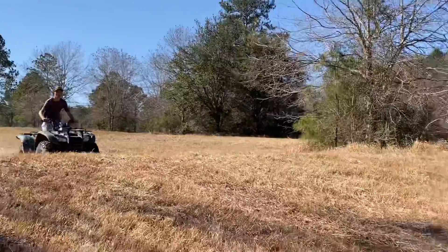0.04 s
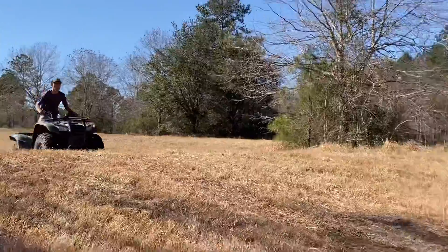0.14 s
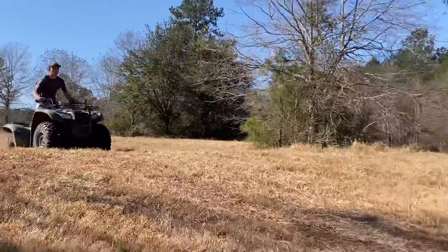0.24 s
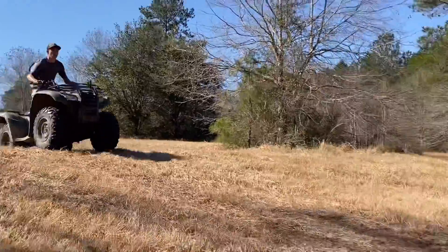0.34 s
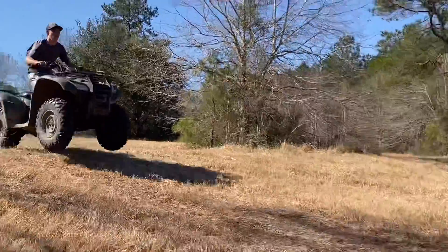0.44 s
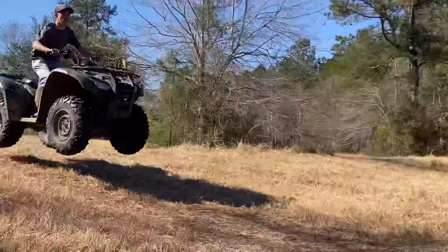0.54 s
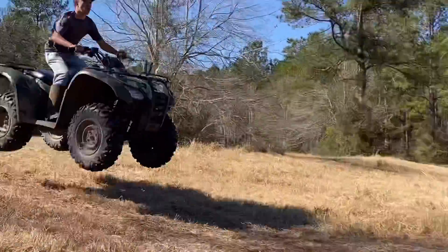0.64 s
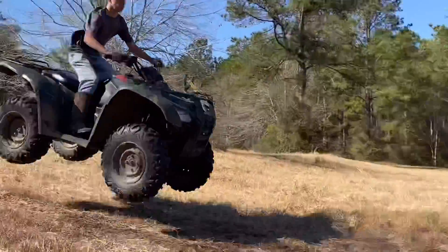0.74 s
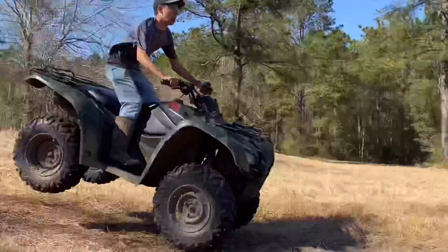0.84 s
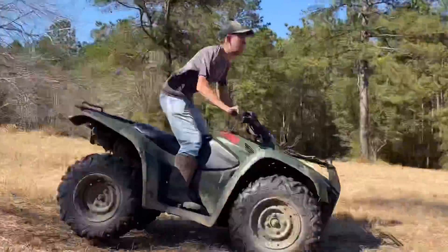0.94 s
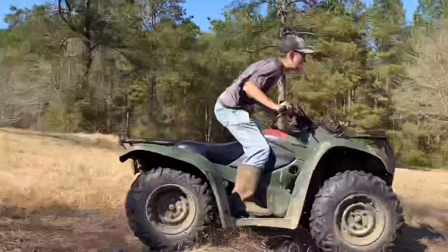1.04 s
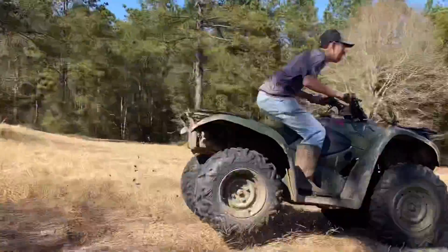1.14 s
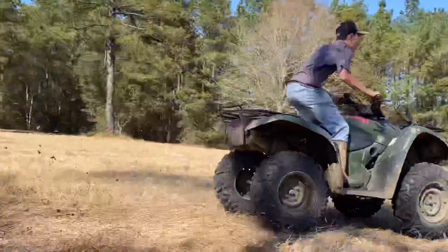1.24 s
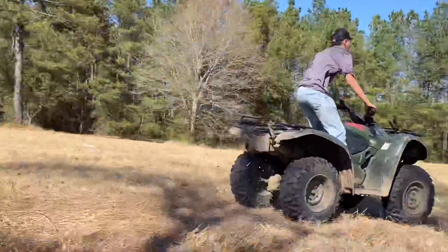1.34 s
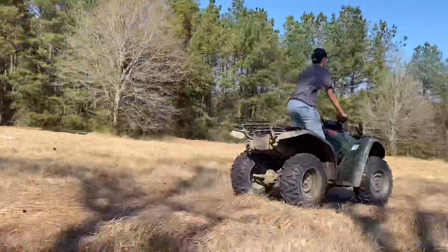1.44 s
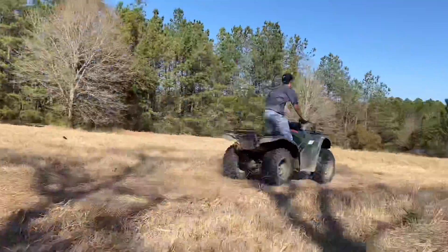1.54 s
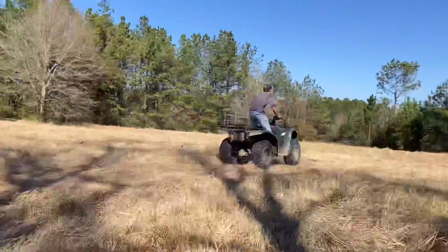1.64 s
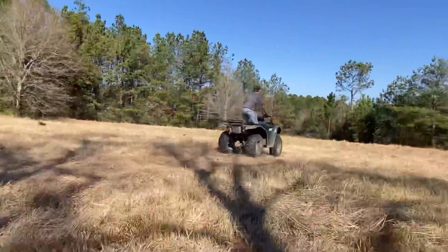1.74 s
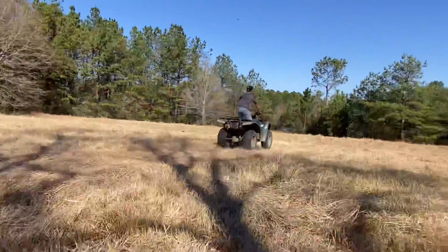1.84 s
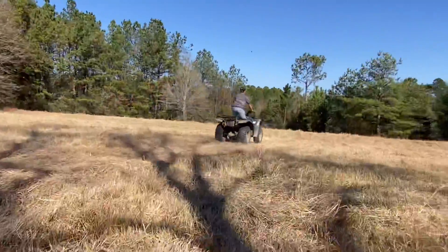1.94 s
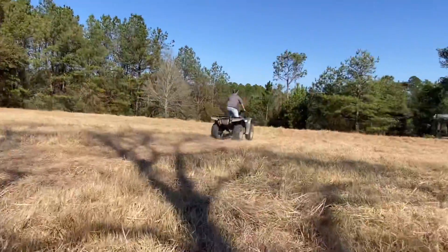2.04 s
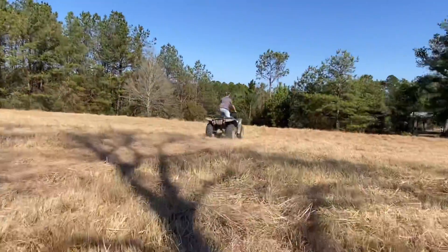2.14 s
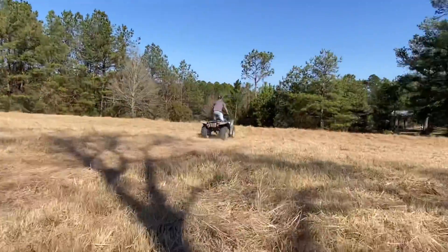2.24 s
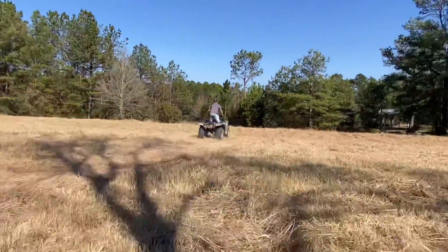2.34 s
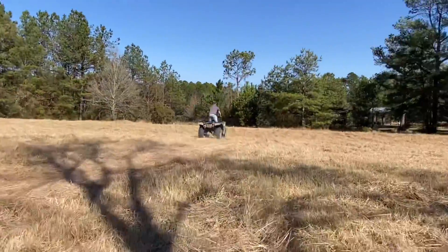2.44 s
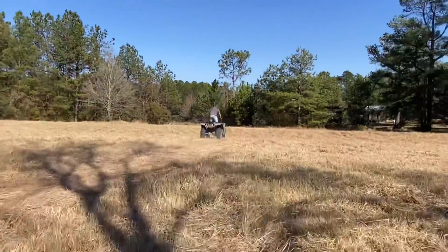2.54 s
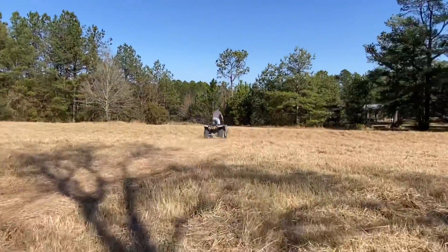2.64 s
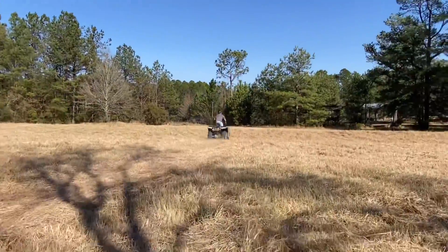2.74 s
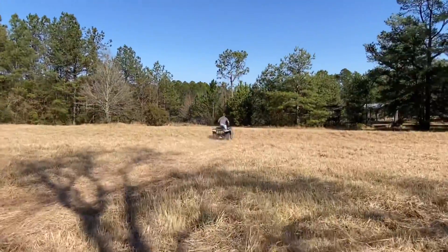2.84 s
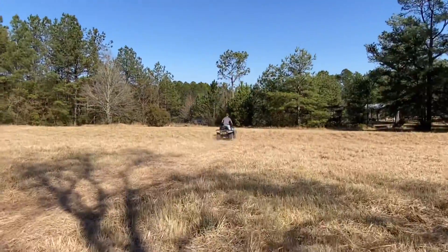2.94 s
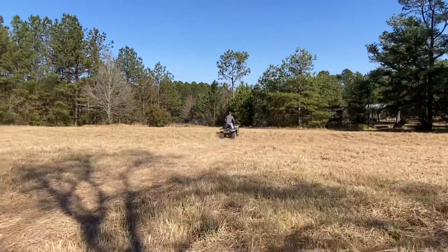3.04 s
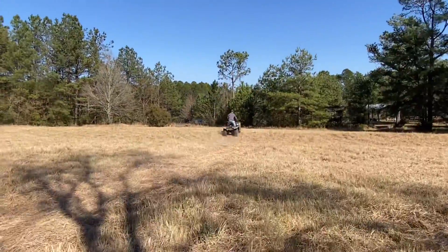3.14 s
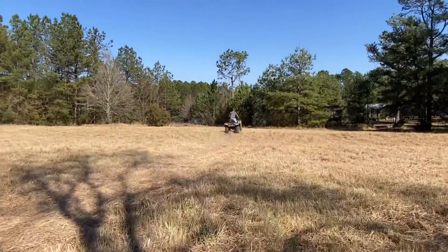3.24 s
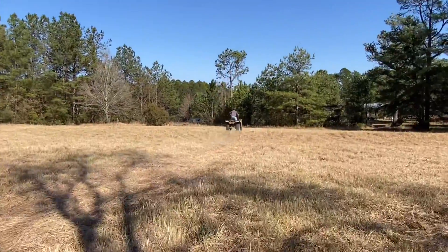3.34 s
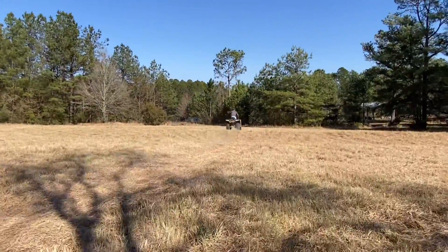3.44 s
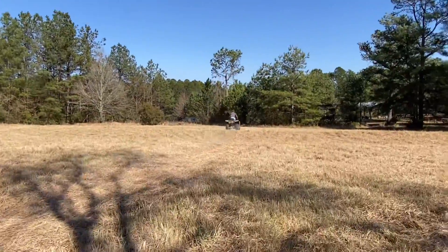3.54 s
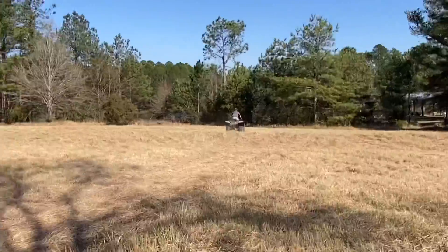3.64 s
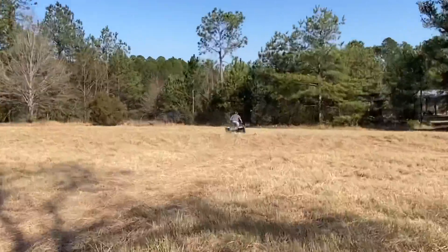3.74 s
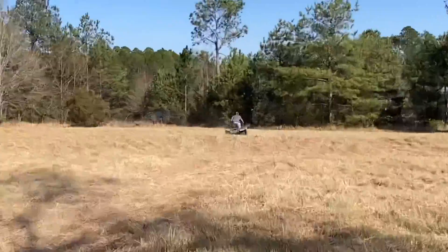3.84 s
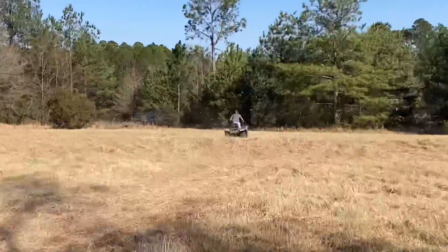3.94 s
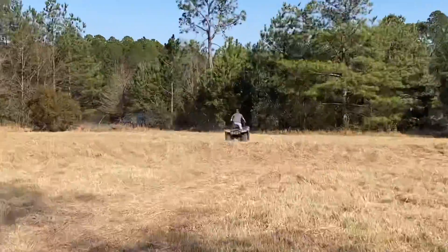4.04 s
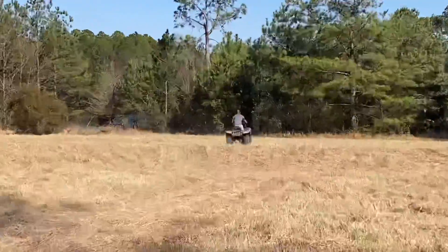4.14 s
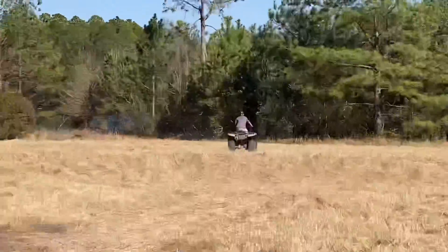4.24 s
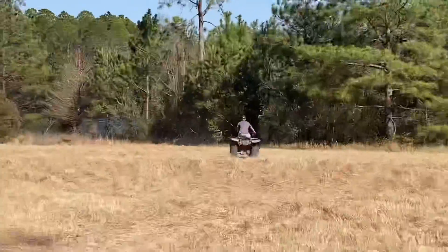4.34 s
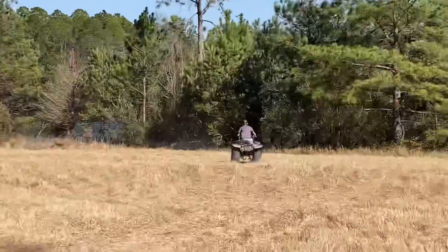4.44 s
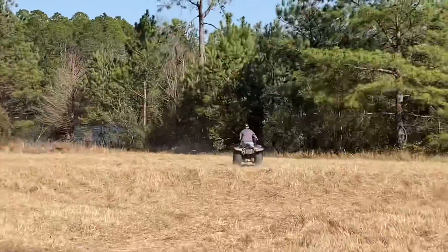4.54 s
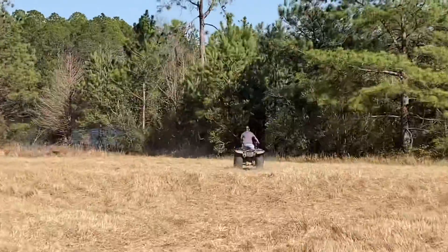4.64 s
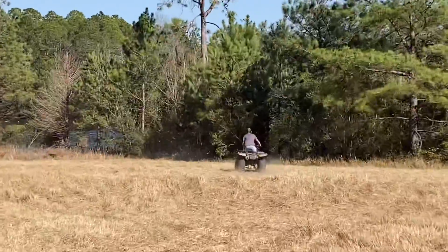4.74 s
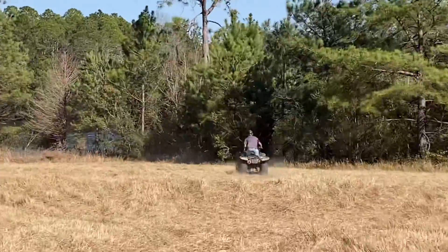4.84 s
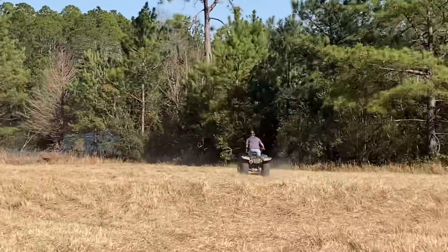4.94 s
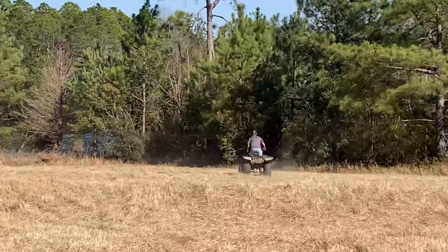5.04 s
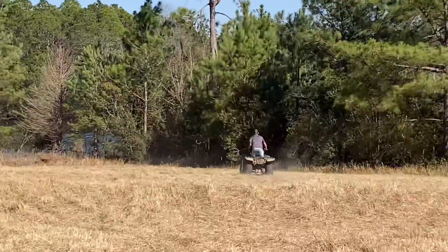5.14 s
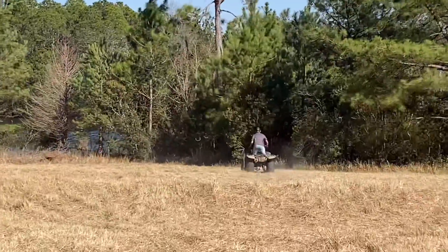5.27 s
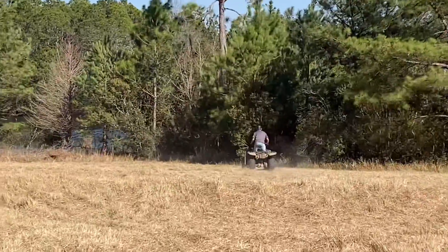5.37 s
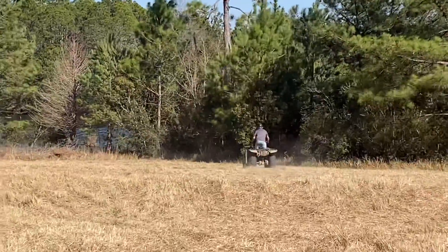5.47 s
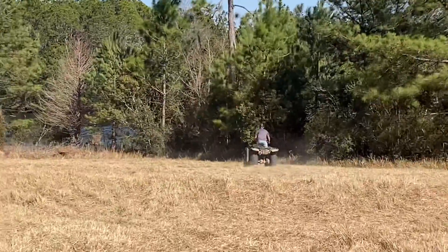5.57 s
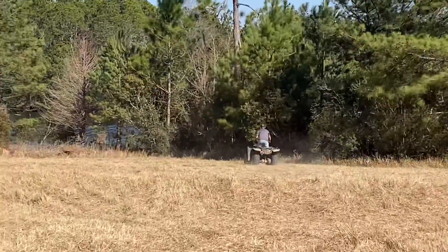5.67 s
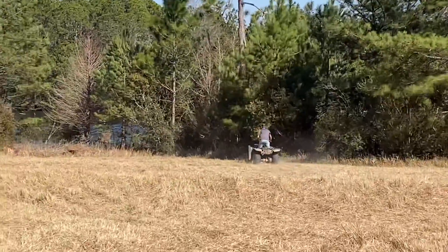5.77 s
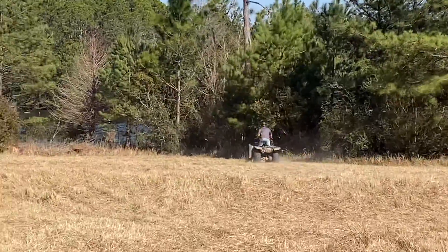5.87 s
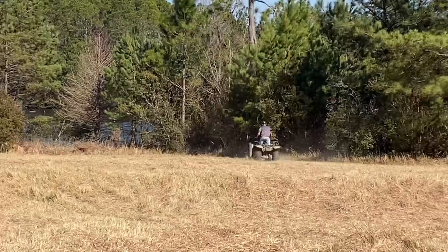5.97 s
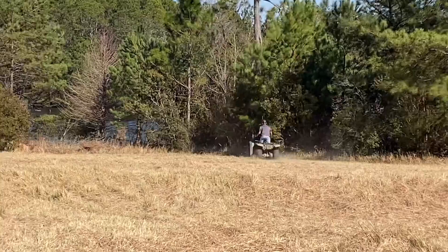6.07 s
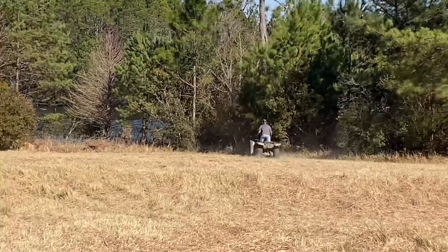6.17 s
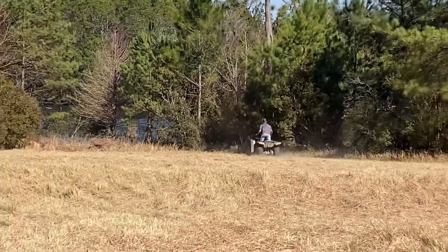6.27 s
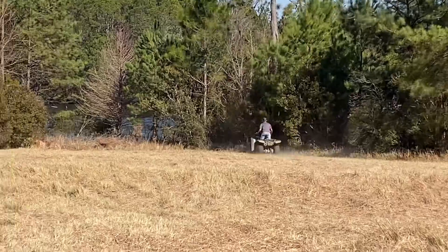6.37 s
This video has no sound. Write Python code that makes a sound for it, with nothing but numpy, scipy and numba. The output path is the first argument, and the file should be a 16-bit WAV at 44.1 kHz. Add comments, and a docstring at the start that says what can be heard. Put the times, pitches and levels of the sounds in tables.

```python
"""A single-cylinder four-stroke quad bike revs past a phone in a dry, windy field. Each firing rings the
muffler and spits a puff of gas, while gears and tyres whir. About a second in, the quad lands from a
jump with a crunch, clanks and squeaks. It rides off, blipping its throttle (short bursts of power).
Around four seconds, gusts slap the microphone and something dry rustles and ticks close by.
Two last, gentler blips follow as the engine fades."""
import sys
import numpy as np
from scipy import signal
from scipy.fft import rfft, irfft, next_fast_len
from scipy.io import wavfile
from scipy.ndimage import uniform_filter1d, map_coordinates
from numba import njit

SR = 44100
rng = np.random.default_rng(int(sys.argv[2]) if len(sys.argv) > 2 else 0)


def store_wav(level_fs):
    """Save 16-bit WAV to argv[1]."""
    pcm = np.round(np.clip(np.atleast_2d(level_fs), -1, 1) * 32767)
    wavfile.write(sys.argv[1], SR, pcm.T.astype(np.int16))


N = 282655
T = np.arange(N) / SR

# tone of the field's quiet hiss: (frequency [Hz], relative level [dB])
FIELD_TONE = [(300, 3.5), (500, -2), (1000, 6.5), (2500, -21), (5000, -58), (8000, -18.5), (16000, -36)]
# wind on the microphone: (time [s], level [dB])
WIND_LEVEL = [(0.0, -22), (0.35, -18.5), (0.55, -29), (1.2, -20.5), (1.5, -33), (2.0, -28), (2.7, -25.5),
              (2.95, -18.5), (3.4, -26.5), (3.9, -17.5), (4.35, -33.5), (5.6, -35.5), (5.95, -31),
              (6.41, -37)]
# sudden slaps of wind: (time [s], peak [dB], pitch [Hz], sharpness [0-1])
WIND_SLAPS = [(3.629, -5.5, 110, 0.46), (3.789, -6.5, 137, 0.93), (3.818, 0.5, 61, 0.8),
              (3.873, -3.5, 118, 0.16), (3.93, -14, 78.4, 0.13), (3.964, -9.5, 73.2, 0),
              (4.25, -15, 104, 0.1), (5.883, -17, 100, 0.2), (5.903, -8.5, 109, 0.04)]
# dry rustles, one list for each: (time [s], level [dB])
RUSTLES = [
    [(3.45, -63), (3.518, -41), (3.65, -53)],
    [(4.17, -59), (4.344, -40), (4.41, -58)],
]
# small dry ticks: (time [s], level [dB])
DRY_TICKS = [(4.4223, -30.5), (4.43, -32), (4.4463, -31), (4.594, -38)]

# tone of gears and tyres: (frequency [Hz], relative level [dB])
WHIR_TONE = [(450, 6.5), (600, 1.5), (880, 1.5), (1150, -6.5), (1500, -1.5), (2100, -8.5), (2900, -6.5),
             (4000, -13), (7000, -20), (11000, -24), (16000, -26)]
# the suspension hitting its stops: (time [s], level [dB])
CRUNCH_LEVEL = [(0.88, -19), (0.96, -18.5), (1.0, -8.5), (1.045, -15.5), (1.075, -17), (1.13, -16)]
# where that crunch rings: (pitch [Hz], width [Hz], level [dB])
CRUNCH_MODES = [(248, 52, 7.5), (344, 120, 0.5), (496, 115, -2.5), (940, 530, -8)]
# knocks from the landing and bumps: (time [s], level [dB], time to fade by 60 dB [s])
FRAME_KNOCKS = [(0.885, -23, 0.075), (0.9394, 4, 0.058), (0.964, -5.5, 0.14), (0.9967, -4.5, 0.16),
                (1.583, -11.5, 0.059)]
# where the frame rings: (pitch [Hz], level [dB], time to fade by 60 dB [s])
FRAME_MODES = [(1104, 1, 0.72), (1436, 3.5, 0.059), (2200, -2, 0.12), (3140, 5, 0.05), (3920, 6, 0.037),
               (5540, -3, 0.065), (8700, -12, 0.079)]
# rubber, springs and gears: (start [s], end [s], from [Hz], to [Hz], level [dB], overtones [0-1])
SQUEAK_NOTES = [(0.032, 0.057, 3100, 3320, -37.5, 0.8), (0.1, 0.255, 864, 870, -34, .01),
                (0.984, 1.023, 962, 840, -15.5, 0.25), (1.022, 1.068, 310, 369.4, -12, 0.13),
                (1.455, 1.473, 3040, 3000, -26, 0.1), (1.607, 1.662, 787, 852, -29, 0.05),
                (2.894, 2.97, 740, 785, -39, 0.16), (2.966, 3.05, 788, 754, -38, 0.1)]

# twists of the throttle: (opens [s], shuts [s], how far [0-1])
THROTTLE_BLIPS = [(0.0, 0.45, 0.66), (0.888, 1.381, 0.57), (2.075, 2.504, 0.94), (2.952, 3.269, 0.85),
                  (3.933, 4.126, 0.6), (5.22, 5.43, 0.53), (5.633, 5.752, 0.4)]
# how often the engine fires: (time [s], rate [Hz])
FIRING_RATE = [(0.0, 42.93), (0.23, 35.7), (0.4, 46.79), (0.86, 34.92), (1.11, 33.55), (1.31, 48.1),
               (1.39, 50.01), (1.57, 44.36), (1.73, 28.48), (2.07, 24.0), (2.21, 33.2), (2.33, 45.1),
               (2.41, 50.0), (2.51, 49.5), (2.57, 46.7), (2.83, 41.11), (3.02, 32.85), (3.27, 50.5),
               (3.71, 40.7), (4.0, 31.4), (4.2, 33.41), (4.56, 26.35), (5.248, 24.2), (5.33, 28.0),
               (5.4, 27.5), (5.48, 25.0), (5.612, 26.1), (5.696, 27.5), (5.8, 30.3), (5.896, 27.5),
               (6.0, 24.0), (6.104, 22.6), (6.2, 21.5), (6.41, 22.5)]
# levels with the throttle shut: (time [s], muffler boom [dB], gas [dB], whir [dB], tyre hiss [dB])
RIDE_LEVELS = [(0.0, -19.5, -46.5, -37.5, -49), (0.3, -19, -62, -39.5, -37.5),
               (0.5, -11.5, -49.5, -33.5, -34), (0.87, -11, -40, -29, -35), (0.93, -11, -41.5, -26.5, -28),
               (1.2, -14.5, -22, -25.5, -28), (1.45, -11, -36.5, -30.5, -33), (1.7, -11, -37, -30.5, -39),
               (1.9, -14.5, -38, -44.5, -38), (2.05, -17, -41, -42, -45), (2.55, -15.5, -42, -37.5, -39),
               (2.82, -16, -44.5, -44.5, -45), (2.93, -26, -47.5, -41, -53), (3.3, -17.5, -46, -43, -41.5),
               (3.7, -22.5, -43.5, -49, -45.5), (4.05, -29.5, -61, -49.5, -56.5),
               (4.3, -22.5, -52, -46, -49), (4.7, -26.5, -51, -51, -54), (5.2, -27, -54.5, -52, -54),
               (5.7, -32, -57, -53.5, -55), (6.41, -30.5, -64, -52.5, -58)]
# exhaust, throttle shut: (time [s], boom pitch [Hz], thump above boom [dB], bark above boom [dB])
EXHAUST_TONE = [(0.0, 171, -19, -14), (0.22, 135.5, -10, -4.5), (0.4, 144, -16, -10.5),
                (0.55, 131.4, -13.5, -6), (0.9, 121.4, -12.5, -6), (1.15, 119.7, -9, -1.5),
                (1.45, 137.6, -12.5, -12.5), (1.75, 112.6, -10.5, -8), (2.05, 116.7, -7.5, -7.5),
                (2.25, 149, -13.5, -8.5), (2.5, 129, -8.5, -11), (2.7, 135, -13, -13.5),
                (2.95, 139.7, -10, -4.5), (3.3, 137, -12, -14), (3.7, 120.6, -10, -7), (4.15, 136, -7, -14),
                (4.55, 108, -30, -9), (5.2, 109, -6, -10), (5.35, 143, -21, -11.5), (5.5, 120, -28, -21.5),
                (5.8, 148, -10, -11), (6.1, 107.6, -5, -15.5), (6.41, 116, -8, -11.5)]
# the exhaust's deep thump: (pitch [Hz], width [Hz], level [dB])
THUMP_MODES = [(59.2, 15.4, 5.5), (75, 32, 3)]
# the exhaust's throaty bark: (pitch [Hz], width [Hz], level [dB])
BARK_MODES = [(188.2, 39.3, 7.5), (245, 113, 1.5), (297, 31, 2), (392, 44, -2.5)]
# gas hissing out of the tailpipe: (frequency [Hz], width [Hz], level [dB])
GAS_MODES = [(1103, 280, 7), (2230, 610, 5), (2560, 490, 4), (3380, 770, 2), (4520, 3100, 1),
             (7850, 7000, -0.5), (13100, 12000, -7.5), (15900, 1500, -28)]
# where the tailpipe rings: (pitch [Hz], width [Hz], level [dB])
PIPE_MODES = [(2020, 230, 2), (2644, 430, 2.5), (3155, 260, 6), (3500, 640, 4.5), (4520, 560, 5)]
# strength of that ring: (time [s], level above the gas hiss [dB])
PIPE_RING_LEVEL = [(0, -4), (1.0, -1.5), (1.4, -5.5), (1.75, 3), (2.3, 0), (2.8, -2), (3.3, -1.5), (4.2, 4),
                   (4.8, 10.5), (6.41, 10.5)]

# balance of the phone's two microphone holes: (frequency [Hz], left minus right [dB])
MIC_BALANCE = [(60, 2.0), (110, 2.5), (200, 2.5), (380, 1.0), (700, 5.0), (1290, 3.5), (2380, 1.5),
               (4400, 1.5), (8120, 0.5), (15000, 0.0)]
# timing between the holes: (frequency [Hz], left ahead by [radians])
MIC_PHASE = [(0, 0), (520, 0.7), (780, -0.1), (1550, 1.5), (2150, 0.1), (7490, 0.0), (8440, -2.9),
             (9560, -3.3), (10400, -6.0), (11600, -6.4), (12600, -9.1), (13700, -9.5), (14600, -12.4),
             (16400, -12.7)]
# a short, flipped echo off the ground hollows out the highs, and at the same times the highs spread wide: (time
# [s], echo delay [ms], amount of both [0-1])
GROUND_ECHO = [(1.55, 0.14, 0.2), (1.7, 0.68, 0.7), (1.85, 1.16, 0.77), (2.15, 1.25, 1), (2.4, 1.31, 1),
               (2.8, 1.63, 1), (3.2, 1.55, 1), (3.6, 1.37, 1), (3.78, 1.5, 0.16)]


def undb(db):
    """Turn decibels into a gain to multiply by."""
    return 10 ** (np.asarray(db) / 20)


def level(x, db=0):
    """Scale a sound to an average level."""
    return x * undb(db) / np.sqrt(np.mean(x ** 2))


def steady(x):
    """Even out slow changes in loudness."""
    return x / np.sqrt(uniform_filter1d(uniform_filter1d(x ** 2, 5000), 5000) + 1e-12)


def curves(rows):
    """Join a table's points over time: one curve for each value column."""
    times, *columns = np.transpose(rows)
    return [np.interp(T, times, column) for column in columns]


def burst(rows):
    """Gain curve from (time, level) points, silent before and after them."""
    times, db = np.transpose(rows)
    return uniform_filter1d(undb(np.interp(T, times, db)) * (T > times[0]) * (T < times[-1]), 300)


def wander(rate):
    """Smooth random wobble of about +-1, with `rate` new values a second."""
    hold = int(SR / rate)
    steps = np.repeat(rng.standard_normal(N // hold + 1), hold)
    return 2.03 * uniform_filter1d(uniform_filter1d(steps, hold), hold)[:N]


def noise(count=N):
    """Plain white hiss."""
    return rng.standard_normal(count)


@njit
def moving_filter(x, hz, width):
    """Band-pass filter: keeps what lies near a pitch that may change every sample."""
    out, mid, low = np.empty(len(x)), 0., 0.
    for i in range(len(x)):
        step, damping = np.tan(np.pi * hz[i] / SR), width / hz[i]
        swing = (mid + step * (x[i] + 1e-18 - low)) / (1 + step * (step + damping))
        mid, low = 2 * swing - mid, low + 2 * step * swing
        out[i] = damping * swing
    return out


def resonate(x, hz, width, passes=1):
    """Let a sound ring at a pitch; a smaller width (in Hz) rings longer."""
    for _ in range(passes):
        x = moving_filter(x, hz * np.ones(len(x)), float(width))
    return x


def modes(x, table, wobble_db=0):
    """Ring at several pitches (modes) at once, flipping every second one."""
    return sum((-1) ** k * undb(db + wobble_db * wander(7.8)) * resonate(x, hz, width)
               for k, (hz, width, db) in enumerate(table))


def band(x, low_hz, high_hz):
    """Keep what lies between two frequencies."""
    return signal.sosfiltfilt(signal.butter(2, [low_hz, high_hz], "band", fs=SR, output="sos"), x)


def shaped_noise(tone, flicker_db):
    """Noise with a given tone, made of narrow bands that each flicker on their own."""
    hz, db = np.transpose(tone)
    centres = hz[0] * 2 ** np.arange(0, np.log2(hz[-1] / hz[0]), 1 / 3)
    levels = np.interp(np.log(centres), np.log(hz), db)
    return level(sum(undb(band_db + flicker_db * wander(16)) * resonate(noise(), f, f / 3, passes=2)
                     for f, band_db in zip(centres, levels)))


def field():
    """The open field hisses faintly, differently in each ear."""
    return np.array([shaped_noise(FIELD_TONE, flicker_db=1) for _ in range(2)]) * undb(-53.5)


def wind():
    """Air buffets both microphone holes with a low rumble and sudden slaps."""
    shared, left, right = (resonate(resonate(noise(), 118.4, 113), 54, 61) * undb(1.5 * wander(12))
                           for _ in range(3))
    gusts = undb(curves(WIND_LEVEL)[0] + 1.6 * wander(6))
    out = level(shared + 0.33 * np.array([left, right])) * gusts
    t = np.arange(-1500, 1500) / SR - .004
    snap = np.cos(2 * np.pi * 186 * t) * np.exp(-(t / 0.00089) ** 2)
    for time, db, hz, sharp in WIND_SLAPS:
        thud = np.cos(2 * np.pi * hz * t) * np.exp(-(t * hz / 0.78) ** 2)
        out[:, int(time * SR) - 1500:][:, :len(t)] += undb(db) * ((1 - sharp) * thud + sharp * snap)
    return out


def dry_rustle():
    """Crackly rustles and tiny ticks close to the phone."""
    crackle = noise() * undb(2 * wander(300))
    out = sum(burst(rows) for rows in RUSTLES) * level(resonate(crackle, 10800, 23000))
    t = T[:400]
    for time, db in DRY_TICKS:
        tick = resonate(noise(len(t)), 10300, 12000) * np.exp(-t / 0.0018)
        out[int(time * SR):][:len(t)] += undb(db) * tick
    return out


def scattered_sound(quad):
    """Ground and trees send a faint, late copy of the quad to each side."""
    echoes = [resonate(np.roll(quad, delay), 1500, 3000, passes=2) for delay in (397, 613)]
    return np.array(echoes) * undb(-24)


def ground_echo(pair):
    """A short, flipped echo off the ground hollows out the highs; a smeared copy spreads them wide."""
    delay_ms, amount = curves(GROUND_ECHO)
    middle = pair.mean(axis=0)
    echo = map_coordinates(band(middle, 780, 5000), [(T - delay_ms / 1000) * SR], mode="mirror")
    smear = irfft(np.exp(2j * np.pi * rng.random(129)))
    wide = signal.fftconvolve(band(middle, 350, 6700), smear)[:N] * undb(-2.5)
    return pair + amount * (np.array([wide, -wide]) - undb(-8.5) * echo)


def microphones(x):
    """Two holes hear one sound, each with its own strength and timing at every frequency."""
    size = next_fast_len(N + 4096)
    hz = np.arange(size // 2 + 1) * SR / size
    balance_db = np.interp(hz, *np.transpose(MIC_BALANCE))
    phase = np.interp(hz, *np.transpose(MIC_PHASE))
    left = undb(balance_db / 2) * np.exp(.5j * phase)
    return irfft(rfft(x, size) * np.array([left, 1 / left]), size)[:, :N]


def gears_and_tyres(throttle):
    """Gears and tyres whir and hiss, a little louder with the throttle open."""
    whir_db, hiss_db = curves(RIDE_LEVELS)[2:]
    rolling = shaped_noise(WHIR_TONE, flicker_db=0.9)
    whir = signal.sosfiltfilt(signal.butter(2, 1500, fs=SR, output="sos"), rolling)
    hiss = rolling - whir
    return level(whir, whir_db + 1.5 * throttle) + level(hiss, hiss_db + throttle)


def landing_crunch():
    """The suspension runs out of travel and crunches."""
    grit = noise() * undb(1.2 * wander(88.56))
    return burst(CRUNCH_LEVEL) * level(modes(grit, CRUNCH_MODES))


def clanks():
    """Each knock makes a sharp crack and rings the metal frame and racks."""
    out, t = np.zeros(N), T[:SR // 4]
    for time, db, fade_s in FRAME_KNOCKS:
        phases = rng.random(len(FRAME_MODES)) * 2 * np.pi
        ring = sum(np.sin(2 * np.pi * hz * t + phase) * undb(mode_db - 60 * t / min(fade_s, ring_s))
                   for (hz, mode_db, ring_s), phase in zip(FRAME_MODES, phases))
        crack = 0.8 * resonate(noise(len(t)), 4200, 4200) * undb(-60 * t / fade_s)
        out[int(time * SR):][:len(t)] += .5 * undb(db) * (ring / np.abs(ring).max() + crack)
    return out


def squeaks():
    """Rubber, springs and gears give short, shaky, sliding notes."""
    out = np.zeros(N)
    waver, throb = 1 + 0.0184 * wander(100), undb(2 * wander(80))
    for start, end, from_hz, to_hz, db, overtones in SQUEAK_NOTES:
        hz = np.interp(T, [start, end], [from_hz, to_hz]) * waver
        phase = 2 * np.pi * np.cumsum(hz) / SR
        note = np.sin(phase) + overtones * (np.sin(2 * phase) + np.sin(3 * phase))
        out += note * throb * burst([(start, db), (end, db)])
    return out


def throttle_opening(open_s=0.081, shut_s=0.018):
    """From 0 (shut) to 1 (wide open): each blip rolls on and snaps shut."""
    return sum(far * np.clip((T - start) / open_s, 0, 1) * np.clip((end - T) / shut_s + .5, 0, 1)
               for start, end, far in THROTTLE_BLIPS)


def tailpipe_gas(since_firing, strength, throttle):
    """Puffs of gas hiss and ring the pipe; more throttle makes them longer and the ring brighter."""
    puff_s = 0.0049 + 0.002 * throttle
    puff = strength * (1 - np.exp(-since_firing / 0.0012)) * np.exp(-since_firing / puff_s)
    ring = modes(puff * noise(), PIPE_MODES, wobble_db=-2.5)
    ring = resonate(ring, hz=2030 + 530 * throttle, width=900)
    hiss = modes(puff * noise(), GAS_MODES, wobble_db=1)
    return steady(steady(hiss) + undb(curves(PIPE_RING_LEVEL)[0]) * steady(ring))


def exhaust_bark(firings, since_firing, strength, boom_hz, throttle):
    """Firings ring the exhaust above its boom, and swirling gas roughens the note."""
    rasp = 0.07 * steady(np.exp(-since_firing / 0.084) * noise())
    throat = resonate(modes(steady(firings) + rasp, BARK_MODES, wobble_db=1), 210, 500)
    # each firing slides down in pitch, as the highs leave the pipe first
    from_hz, to_hz, slide_s = 590, 166.7, 0.0038
    cycles = to_hz * since_firing + (from_hz - to_hz) * slide_s * (1 - np.exp(-since_firing / slide_s))
    slide = strength * np.sin(2 * np.pi * cycles) * np.exp(-since_firing / 0.027)
    overtone_hz = 2.066 * boom_hz  # the muffler chambers' second note
    overtone = resonate(resonate(firings, overtone_hz, 49), overtone_hz, 98)
    bark = steady(throat) + undb(-8.5) * steady(slide) + undb(1.5) * steady(overtone)
    growl = resonate(firings, 604, 200, passes=2)  # a higher note of the pipe
    return steady(bark) + undb(-23.5 + 12 * throttle) * steady(growl)


def engine(throttle, uneven_db=1.5):
    """One firing a cycle, never quite the same strength, rings the muffler and spits gas."""
    rate_hz, = curves(FIRING_RATE)
    boom_db, gas_db = curves(RIDE_LEVELS)[:2]
    boom_hz, thump_db, bark_db = curves(EXHAUST_TONE)
    cycles = .4 + np.cumsum(rate_hz) / SR
    count = cycles.astype(int)
    strength, puff_strength = undb(uneven_db * rng.standard_normal((400, 2))[count].T)
    firings = np.diff(count, prepend=count[0]) * strength  # one click as each cycle starts
    since_firing = (cycles % 1) / rate_hz
    gas = tailpipe_gas(since_firing, puff_strength, throttle)
    # two muffler chambers in a row: the boom builds up after the bark
    boom = steady(resonate(resonate(firings, boom_hz, 24.6), boom_hz, 51.4))
    thump = steady(resonate(modes(firings, THUMP_MODES), 86.5, 49))
    bark = exhaust_bark(firings, since_firing, strength, boom_hz, throttle)
    # an open throttle trades boom for thump, gas and, at higher revs, bark
    open_bark_db = 3.5 + 0.5768 * (rate_hz - 39.5)
    return -(boom * undb(boom_db - 4.5 * throttle)
             + thump * undb(boom_db + thump_db + 4.5 * throttle)
             + bark * undb(boom_db + bark_db + open_bark_db * throttle)
             + gas * undb(gas_db + 12 * throttle))


def scene():
    """Mix the quad, its echoes and the windy field in stereo."""
    throttle = throttle_opening()
    quad = engine(throttle) + gears_and_tyres(throttle) + landing_crunch() + clanks() + squeaks()
    return (field() + ground_echo(microphones(quad)) + scattered_sound(quad)
            + microphones(dry_rustle()) + wind())


def record(dry, top_hz=15900):
    """The phone rounds off the loudest peaks and cuts the very highest sounds."""
    rounded = np.tanh(0.52 * dry) / 0.66
    return signal.sosfilt(signal.ellip(8, .2, 70, top_hz, fs=SR, output="sos"), rounded)


dry = scene()
out = record(dry)
store_wav(out)
```